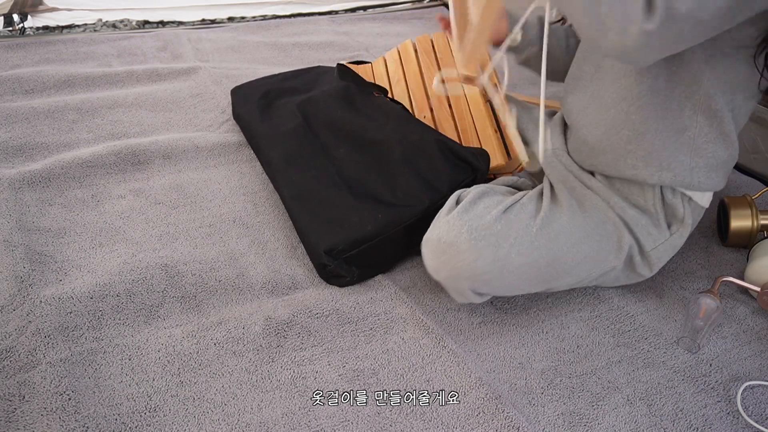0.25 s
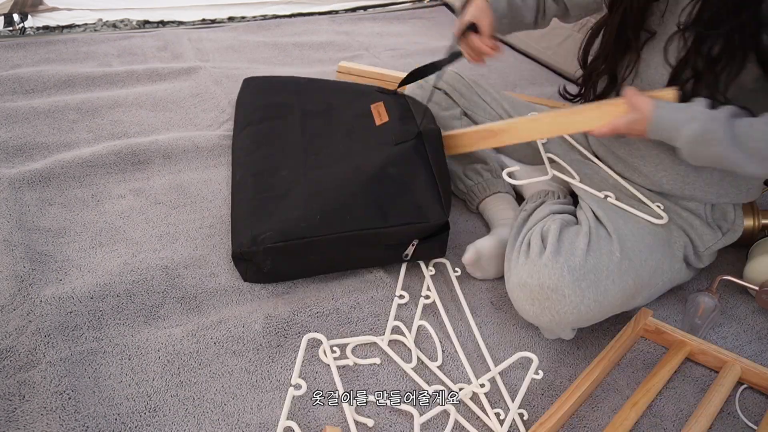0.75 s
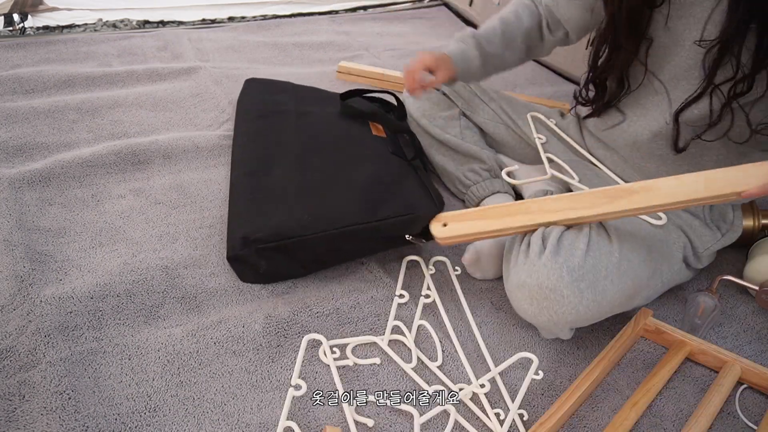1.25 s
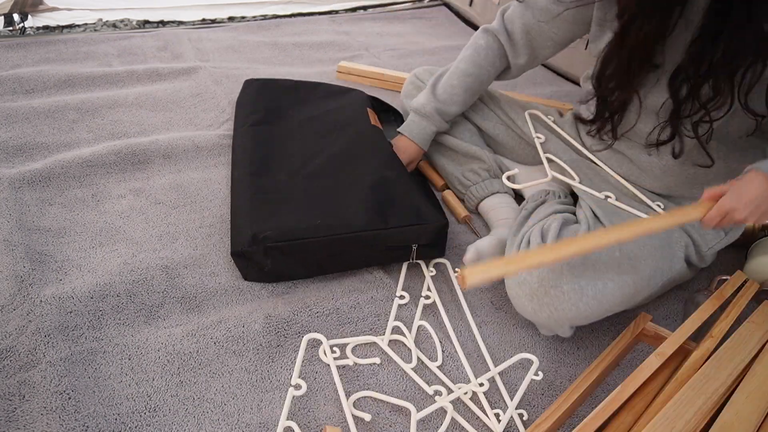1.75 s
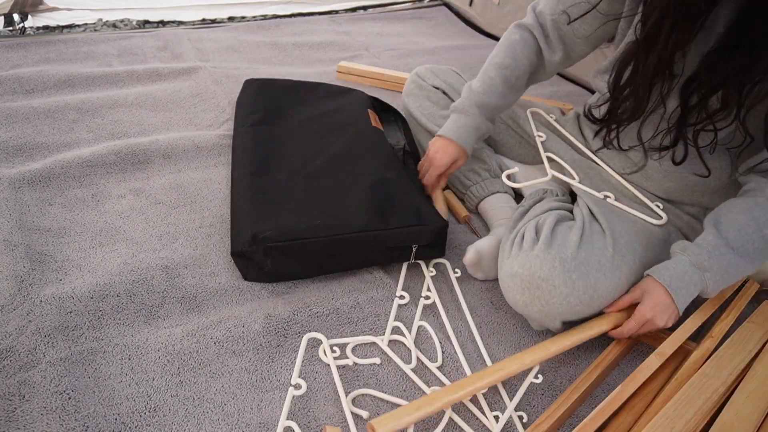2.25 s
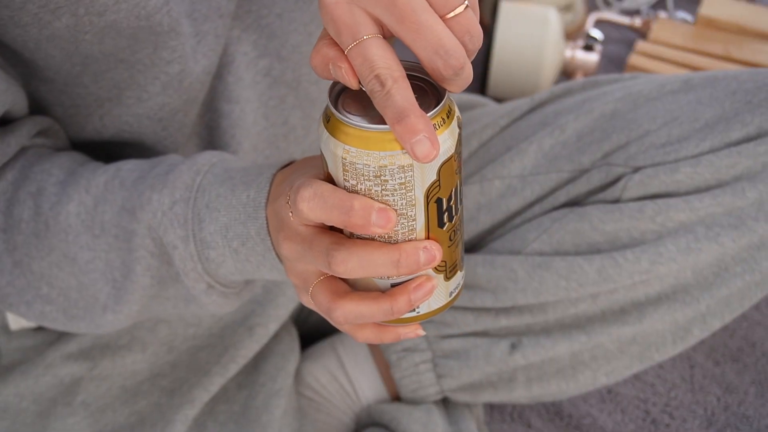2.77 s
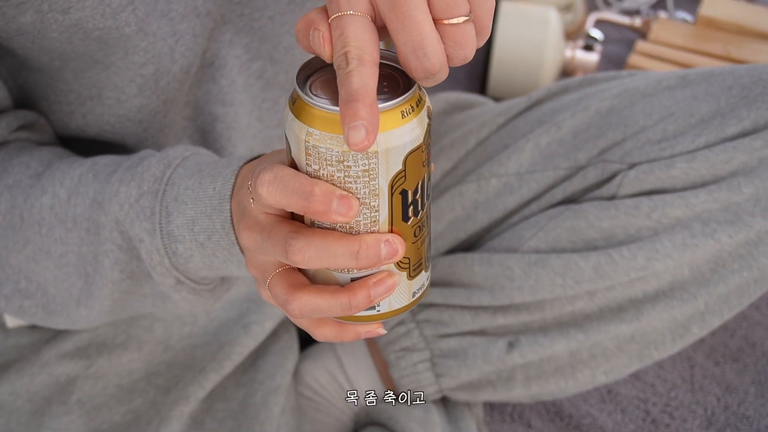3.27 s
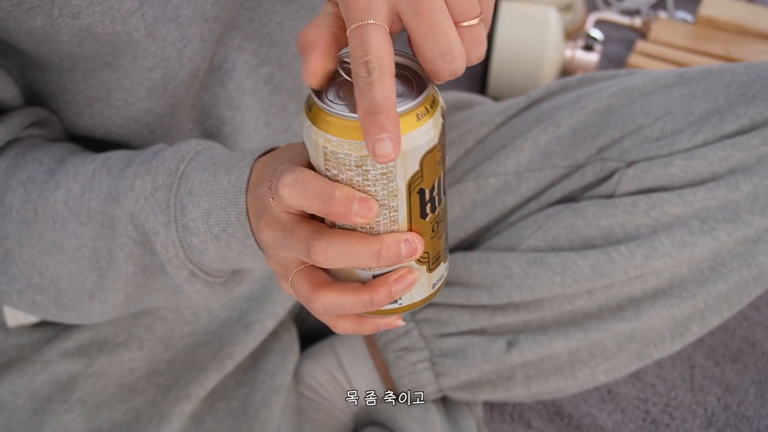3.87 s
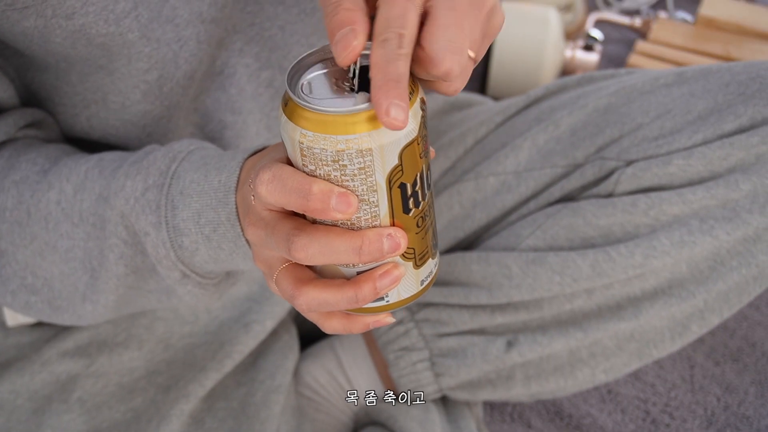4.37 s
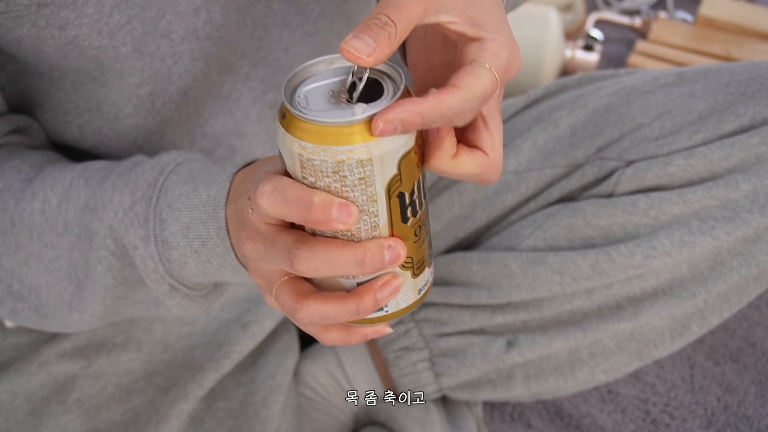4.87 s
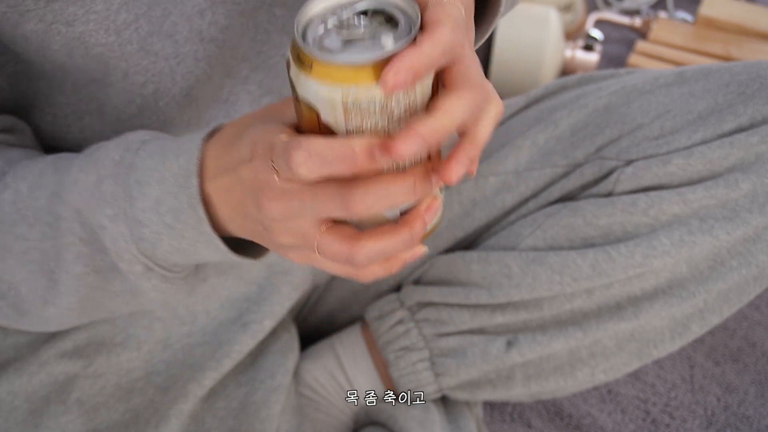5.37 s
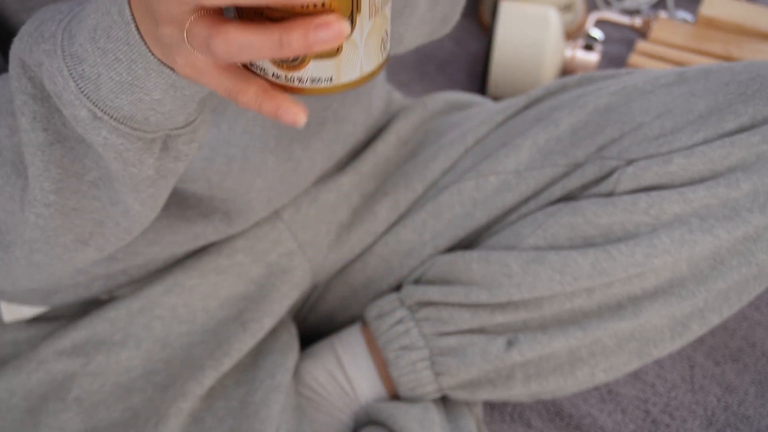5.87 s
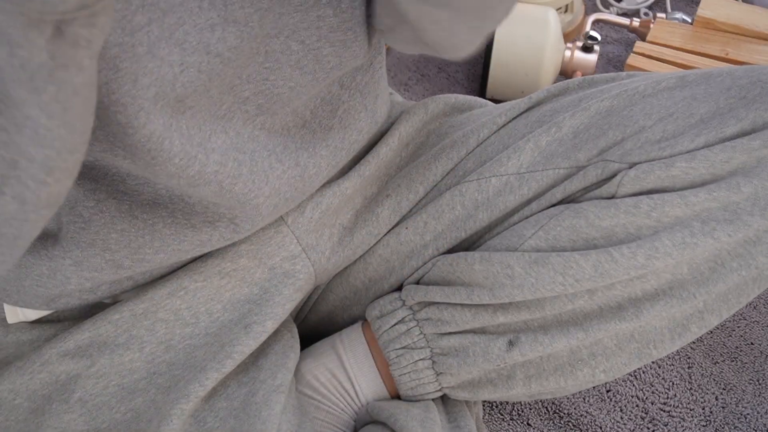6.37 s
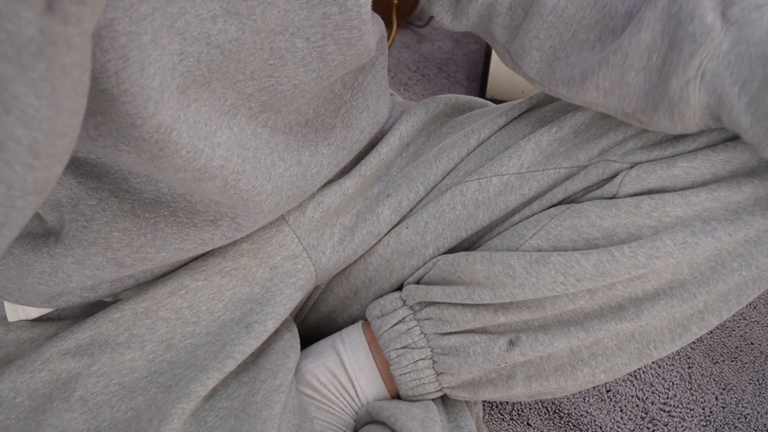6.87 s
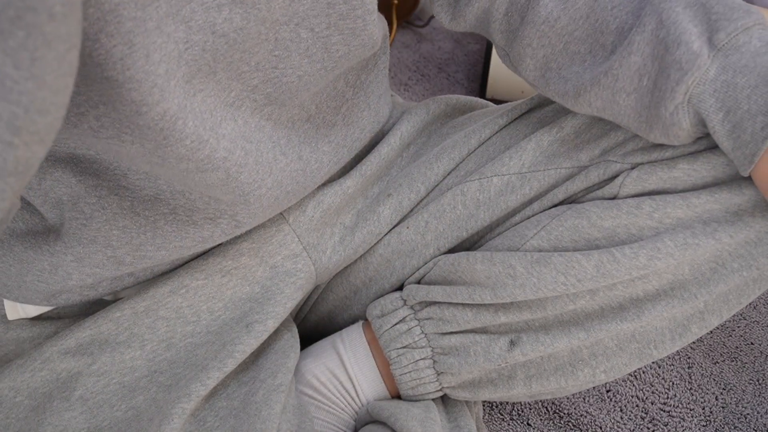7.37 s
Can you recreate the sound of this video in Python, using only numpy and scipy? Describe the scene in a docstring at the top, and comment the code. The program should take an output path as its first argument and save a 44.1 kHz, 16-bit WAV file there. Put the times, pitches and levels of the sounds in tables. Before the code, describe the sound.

Close, dry stereo microphone on a padded tent floor: fabric rustles while hard plastic hangers snap and wooden slats rattle together. After a pole slides, fingernails click on a thin metal can, with a short bright hiss. More ticks lead to a sharp crack and a second, lower fizz, then a scraping tab bend. Sleeves brush by, and quiet hanger clicks end the scene over barely audible outdoor air.

```python
"""In a tent, wooden poles and plastic hangers are pulled from a bag: they knock, clack, drag and slide.
Next a fingernail flicks the tab of a drink can and gas, a coloured noise, spurts out; more clicks and squeaks follow.
The lid cracks open with a second spurt, the tab scrapes as it is bent back, and a sleeve swishes past.
At the end a hand reaches among the poles and hangers. Sleeves and bag, made of noise, rustle throughout.
Each blow is a snap, a rattle and fading sine tones; echoes and faint air surround it all."""
import sys
import numpy as np
from scipy import signal
from scipy.fft import rfft, irfft, next_fast_len
from scipy.io import wavfile
from scipy.ndimage import uniform_filter1d, minimum_filter1d

SR = 44100
rng = np.random.default_rng(int(sys.argv[2]) if len(sys.argv) > 2 else 0)


def pcm_store(signal):
    """Save signal as 16-bit PCM."""
    levels = np.round(np.clip(np.atleast_2d(signal), -1, 1) * 32767)
    wavfile.write(sys.argv[1], SR, levels.astype(np.int16).T)


N = 336483


def gain_of(db):
    """Turns decibels into amplitude."""
    return 10 ** (np.asarray(db) / 20)


def evened(x):
    """Scales a sound to an rms of 1."""
    return x / np.sqrt(np.mean(x ** 2) + 1e-20)


def read(points, hz):
    """Reads a table between its points, on a logarithmic pitch axis."""
    f, value = np.transpose(points)
    return np.interp(np.log(hz + 1), np.log(f + 1), value)


def follow(rows):
    """Gives the start time, then each column of a table as a curve with a value per sample."""
    s, *columns = np.transpose(rows)
    t = np.arange(s[0], s[-1], 1 / SR)
    return [s[0]] + [np.interp(t, s, column) for column in columns]


def add(mix, s, sound):
    """Mixes a sound in, starting at time s."""
    part = mix[:, max(round(s * SR), 0):][:, :sound.shape[1]]
    part += sound[:, :part.shape[1]]


def shaped(x, spectrum):
    """Colours a steady sound with a table of pitch and level."""
    n = x.shape[-1]
    size = next_fast_len(n)
    gain = gain_of(read(spectrum, np.fft.rfftfreq(size, 1 / SR)))
    return irfft(rfft(x, size) * gain, size)[..., :n]


def low_cut(x, edge_hz):
    """Takes out the bass steeply, as small things radiate little of it."""
    sections = signal.butter(2, edge_hz, "high", fs=SR, output="sos").repeat(2, axis=0)
    return signal.sosfilt(sections, x)


# stereo width, the side part against the middle: f/Hz, level/dB
WIDTH = [(1000, -21), (2000, -15), (4000, -9), (8000, -7), (16000, -11)]


def spread(pair):
    """Makes two unrelated sounds into left and right: bass near mono, treble wider."""
    side = shaped(pair[1], WIDTH)
    return np.array([pair[0] + side, pair[0] - side])


def noise(count):
    """White noise, spread in stereo."""
    length = N if count > SR else SR // 2
    return spread(rng.standard_normal((2, length)))[:, :count]


def resonate(x, hz, width):
    """Lets a sound ring at one pitch with gain 1; the pitch may follow a curve."""
    turn = np.exp(2j * np.pi * np.cumsum(hz * np.ones(x.shape[-1])) / SR)
    r = np.exp(-np.pi * width / SR)
    # shift the pitch down to zero, smooth, and shift it back
    smooth = signal.lfilter([1 - r], [1, -r], x / turn + 1e-18)
    return 2 * (turn * smooth).real


def ring(x, modes):
    """Passes a sound through a set of steep resonances, each made of two wider ones in a row."""
    return sum(gain_of(db) * resonate(resonate(x, hz, 2 * width), hz, 2 * width)
               for hz, width, db in modes)


def flutter(depth_db=3.5, rate_hz=34):
    """A random unevenness of level: folds grip and let go, a jet sputters."""
    steps = rng.standard_normal(size=400)
    place = np.arange(N) / SR * rate_hz
    return gain_of(depth_db * np.interp(place, np.arange(len(steps)), steps))


def contact(x, hz, below, above, top_hz, floor_db=-46, size=8192):
    """Colours a blow: its hardness and place favour one region of pitch."""
    f = abs(np.fft.fftfreq(size, 1 / SR)) + 1
    octaves = np.log2(f / hz)
    db = np.maximum(np.minimum(below * octaves, -above * octaves), floor_db)
    db = db - 10 * np.log10(1 + (420 / (f + 40)) ** 4)  # small things radiate little bass
    db = db - 10 * np.log10(1 + (f / top_hz) ** 10)  # no contact is perfectly hard
    response = np.exp(np.conj(signal.hilbert(np.log(gain_of(db)))))  # nothing sounds before the blow
    return np.fft.ifft(np.fft.fft(x, size) * response).real[:, :x.shape[1]]


def blows(rows, ring_db, ring_t60, snap_db, rattle_t60, bass_fall_db, top_hz=14500,
          snap_t60=0.0047, smear=0.79, focus=0.15, count=6000):
    """Each blow is a sharp snap, a short dense rattle and the modes of the thing that is struck."""
    # ring_t60, snap_t60 in s; rattle_t60 in s for a blow of -20 dB; bass_fall_db per octave before focus
    out, t = np.zeros((2, N)), np.arange(count) / SR
    attack = round(.004 * SR)  # a blow's level is that of its first 4 ms
    for s, db, hz, treble_fall, modes in rows:
        t60 = rattle_t60 * (min(db, -10) / -20) ** smear  # soft touches drag, hard ones are crisp
        fade = gain_of(-60 * t / t60) + gain_of(snap_db - 60 * t / snap_t60)
        rattle = spread(rng.choice([-1., 1.], (2, count))) * fade
        chance = rng.standard_normal((len(modes), 3))
        tone = 0
        for (f, level), (detune, phase, lag) in zip(modes, chance):
            turns = f * (1 + 0.0015 * detune) * t + phase
            sides = np.array([[1], [-1]]) * lag * gain_of(read(WIDTH, f))  # left and right differ in phase
            fading = gain_of(ring_db + level - 60 * t / ring_t60)
            tone = tone + fading * np.sin(2 * np.pi * turns + sides)
        bass_fall = bass_fall_db + focus * treble_fall  # a narrow colour is narrow on both sides
        hit = contact(rattle + tone, hz, bass_fall, treble_fall, top_hz)
        add(out, s, gain_of(db) * hit / np.sqrt(np.mean(hit[:, :attack] ** 2)))
    return out


# colour of the outdoor air: f/Hz, relative level/dB
AIR = [(25, -39.5), (85, -9.5), (300, -5.5), (1000, 6.5), (2000, 1.5), (6000, -2.5), (16000, -9)]


def outdoor_air():
    """Faint air outside: steady coloured noise."""
    return gain_of(-66.0) * evened(shaped(noise(N), AIR))


# how long echoes take to fade by 60 dB: f/Hz, t/s
TENT = [(200, 0.058), (1500, 0.1), (5000, 0.13), (14000, 0.11)]


def tent(x, first_s=0.0054, count=9000):
    """Floor and fabric walls return a short, dense patter of echoes."""
    t = np.arange(count) / SR
    taps = rng.choice([-1., 1.], (2, count)) * (rng.random((2, count)) < 4000 / SR) * (t > first_s)
    hz, when, z = signal.stft(spread(taps), SR, nperseg=256)
    fade = gain_of(-60 * when / read(TENT, hz)[:, None])
    tail = signal.istft(z * fade, SR, nperseg=256)[1]
    return signal.oaconvolve(x, tail / np.linalg.norm(tail[0]), axes=1)[:, :N]


# a sleeve brushes past as the can is raised: t/s, level/dB before panning, f/Hz
SLEEVE_SWISH = [(5.9, -63, 2880), (6.12, -54.5, 2700), (6.33, -65, 2180)]


def swish(width_hz=520):
    """A sleeve brushes past: noise rings at a pitch that sinks."""
    s, db, hz = follow(SLEEVE_SWISH)
    return s, gain_of(db) * evened(ring(noise(len(hz)), [(hz, width_hz, 0)]))


def bumps(per_s, low_hz, high_hz, size=N, count=24):
    """Dull little contacts of wood, plastic and mat, each a few cycles at its own pitch."""
    out, t = np.zeros((1, size)), np.arange(SR // count) / SR
    for when, pitch, force in rng.random((int(per_s * size / SR), 3)):
        hz = low_hz * (high_hz / low_hz) ** pitch
        cycles = hz * t
        grain = np.sqrt(hz) * np.sin(2 * np.pi * cycles) * cycles ** 2 * np.exp(-cycles)
        add(out, when * size / SR, gain_of(10 * force ** 3) * grain[None])
    return evened(out[0])


def fibres(per_s, spread_db, grain_db):
    """Rubbing cloth: a smooth wash and many tiny catches of uneven size."""
    size = gain_of(spread_db * np.minimum(rng.exponential(1, (2, N)), 4))
    catches = rng.choice([-1., 1.], (2, N)) * size * (rng.random(N) < per_s / SR)
    return spread(rng.standard_normal((2, N)) + gain_of(grain_db) * evened(catches))


STROKE_RISE_S, STROKE_FALL_S, STROKE_SAG_DB_PER_S = 0.068, 0.021, 8  # a stroke gathers speed, slackens and stops
REST_BODY_DB, REST_HISS_DB = -63.5, -59.5  # cloth never lies quite still; before the trims in cloth()
# one row a movement of sleeve or bag: start t/s, length t/s, hiss level/dB (before the trims in cloth()),
# body against hiss level/dB (before the same trims)
CLOTH_STROKES = [(-0.05, 0.13, -33.5, -9.5), (0.06, 0.8, -42.5, -3), (0.517, 0.25, -35, -16),
                 (0.816, 0.35, -52.5, 2), (0.959, 0.34, -43.5, -5), (1.25, 0.33, -52.5, -1),
                 (1.565, 0.23, -47, -5.5), (1.753, 0.57, -61.5, 9), (2.119, 0.21, -46.5, -2.5),
                 (3.683, 0.47, -49, -7), (4.235, 0.39, -50.5, -3), (4.64, 0.53, -51, -7.5),
                 (5.329, 0.1, -44.5, -10), (5.444, 0.31, -49, -8), (5.817, 0.5, -48, -7.5),
                 (5.896, 0.086, -45.5, -26), (6.578, 0.34, -54.5, -28), (6.72, 0.11, -46.5, -31),
                 (6.934, 0.5, -50.5, -6.5), (6.985, 0.044, -41, -14), (7.38, 0.22, -49.5, -10),
                 (7.527, 0.2, -40.5, -19)]


def strokes():
    """Each movement makes body and hiss rise, sag and die away; overlapping ones add in power."""
    t = np.arange(N) / SR
    body, hiss = gain_of(REST_BODY_DB) ** 2, gain_of(REST_HISS_DB) ** 2
    for start, length, db, body_db in CLOTH_STROKES:
        age = np.maximum(t - start, 0)
        rise = np.minimum(age / STROKE_RISE_S, 1)
        speed = rise * np.exp(-np.maximum(age - length, 0) / STROKE_FALL_S)
        power = (speed * gain_of(db - STROKE_SAG_DB_PER_S * age)) ** 2
        body = body + power * gain_of(body_db) ** 2
        hiss = hiss + power
    return np.sqrt(body), np.sqrt(hiss)


# colours of the cloth's body, its hiss and the scuffed mat: f/Hz, relative level/dB
CLOTH_BODY = [(100, -64.5), (250, -33), (500, -24.5), (900, 6.5), (1300, 10), (1900, 12.5), (2600, 0.5),
              (4000, -38)]
CLOTH_HISS = [(1200, -34.5), (2400, -0.5), (3200, 2), (4600, 1), (6500, -4), (9000, -9.5), (12000, -14.5),
              (16000, -27.5)]
MAT_SCUFF = [(100, -38), (170, -9), (280, 4.5), (500, 13), (900, 5), (2000, -20.5)]
# where the arms are: t/s, left minus right level/dB
CLOTH_PAN = [(0.0, 1.0), (4.6, 0.0), (6.0, -2.0), (7.6, -0.8)]


def cloth(body_db=-4.0, hiss_db=-3.5, scuff_db=-61, bumps_db=-54, growth=2.7, ticks_db=-7, ticks_per_s=60):
    """Sleeves and bag rustle, fingers tick; strong movements also scuff the mat and jostle things on it."""
    body, hiss = strokes()
    rub = fibres(per_s=720, spread_db=3.0, grain_db=-10.5) * flutter()
    touches = noise(N) * (rng.random(N) < ticks_per_s / SR)
    tick_colour = shaped(touches, CLOTH_BODY) / gain_of(2.5) + shaped(touches, CLOTH_HISS)
    ticks = gain_of(ticks_db) * body * evened(tick_colour)
    out = body * gain_of(body_db) * evened(shaped(rub, CLOTH_BODY))
    out += ticks + .5 * tent(ticks)
    out += hiss * gain_of(hiss_db) * evened(shaped(rub, CLOTH_HISS))
    add(out, *swish())
    scuff = gain_of(scuff_db) * evened(shaped(rub, MAT_SCUFF))
    jostle = scuff + gain_of(bumps_db) * bumps(per_s=280, low_hz=580, high_hz=2600)
    vigour = body / gain_of(-48)  # 1 when the body stands at -48 dB
    pan_db = np.interp(np.arange(N) / SR, *np.transpose(CLOTH_PAN))
    return (out + vigour ** growth * jostle) * gain_of([pan_db / 2, -pan_db / 2])


# dull pushes carried through mat and hands by the heavier contacts: t/s, level/dB before the fade
THUDS = [(0.172, -43.5), (1.047, -37.5), (1.1541, -34), (4.17, -40)]
# colour of a push: f/Hz, relative level/dB
THUD = [(100, -32.5), (210, 3.5), (420, 7.5), (700, 10.5), (1500, -27.5), (4000, -47.5)]


def thuds(t60=0.069, attack_s=0.0047, count=6000):
    """A short, low puff that the soft mat damps at once."""
    out, t = np.zeros((2, N)), np.arange(count) / SR
    for s, db in THUDS:
        fade = np.minimum(t / attack_s, 1) * gain_of(db - 60 * t / t60)
        add(out, s, fade * evened(shaped(noise(count), THUD)))
    return out


# notes of a flat slat of wood, and of a hanger's hook and arm: f/Hz, relative level/dB
SLAT = [(1620, -1), (2610, 7), (5160, 5), (5281, 8.5), (6620, 4), (8020, 5.5)]
HANGER_HOOK = [(1490, 2.5), (3475, -3.5), (4290, 0), (4800, 5), (5006, -4.5), (6250, 1), (7910, -0.5)]
HANGER_ARM = [(3027, -4.5), (3171, 0.5), (4140, -20), (4330, -3.5), (5730, 7.5)]
# one row a clack: t/s, level/dB before panning, brightest f/Hz, fall above it (dB per octave), what rings
HANGER_CLACKS = [(0.3975, -15.5, 4850, 18, HANGER_HOOK), (0.4015, -5.5, 4800, 11, HANGER_HOOK),
                 (0.406, -14, 4970, 14, HANGER_HOOK), (0.5997, -7, 4290, 64, HANGER_ARM),
                 (0.6045, -22.5, 4000, 75, HANGER_ARM), (0.622, -23, 3900, 10, HANGER_ARM),
                 (1.1538, -29, 1530, 5.3, HANGER_HOOK), (6.965, -44.5, 2150, 5.1, HANGER_ARM),
                 (7.094, -34.5, 4570, 18, HANGER_HOOK), (7.2238, -37.5, 1460, 7.3, HANGER_ARM),
                 (7.257, -43, 1510, 8.2, HANGER_HOOK), (7.2975, -41.5, 2250, 13, HANGER_ARM),
                 (7.307, -36, 5750, 28, HANGER_HOOK), (7.322, -33, 2550, 5.4, HANGER_ARM),
                 (7.356, -47, 5600, 30, HANGER_ARM)]


def hanger_clacks():
    """Plastic hangers clack: a strong snap, a brief rattle and short-lived notes."""
    return blows(HANGER_CLACKS, ring_db=-16, ring_t60=0.034, snap_db=-4.5, rattle_t60=0.013, bass_fall_db=8)


# notes of the rack, a stacked pole and a hand-held pole: f/Hz, relative level/dB
RACK = [(450, 4.5), (820, 1.5), (1150, 0), (2050, -0.5), (2875, -3.5), (3260, -10), (3700, 1.5), (4550, 1),
        (4790, -1)]
STACKED_POLE = [(1595, 4.5), (1952, 2.5), (2440, 4.5), (2541, 2), (3410, 2.5)]
HELD_POLE = [(835, 6.5), (1618, 7.5), (2458, -0.5), (3432, 9.5)]
# one row a knock: t/s, level/dB, brightest f/Hz, fall above it (dB per octave), what rings
POLE_KNOCKS = [(0.047, -27.5, 2340, 24, RACK), (0.073, -42, 820, 9.5, RACK), (0.183, -26, 1450, 13, RACK),
               (0.704, -43, 820, 22, RACK), (0.7235, -9.5, 2600, 7.5, SLAT), (0.728, -24.5, 2760, 5, SLAT),
               (0.892, -35, 2150, 22, STACKED_POLE), (0.9675, -39.5, 2820, 8.5, RACK),
               (0.9815, -24.5, 3080, 18, RACK), (0.987, -26.5, 1430, 8, HANGER_HOOK),
               (1.006, -28.5, 1920, 9, RACK), (1.034, -29, 3700, 4, RACK), (1.046, -9.5, 3500, 13.5, RACK),
               (1.0615, -21, 3450, 10, RACK), (1.087, -27, 1170, 5.5, RACK), (1.160, -31, 2500, 9.5, SLAT),
               (1.173, -41.5, 1100, 5.5, RACK), (1.474, -42.5, 950, 4.5, RACK),
               (2.1113, -15, 1620, 3.5, STACKED_POLE), (2.118, -19.5, 2440, 7.5, STACKED_POLE),
               (2.127, -17.5, 1640, 3.5, RACK), (2.141, -25.5, 4360, 8, RACK),
               (2.185, -27.5, 1940, 14, STACKED_POLE), (2.216, -40, 1950, 12, STACKED_POLE),
               (2.2227, -14.5, 2000, 2.5, HELD_POLE), (2.266, -32, 1460, 1, HELD_POLE),
               (7.195, -44.5, 1940, 26.5, STACKED_POLE)]


def pole_knocks():
    """Wooden poles knock together: a longer rattle and wooden notes."""
    return blows(POLE_KNOCKS, ring_db=-10, ring_t60=0.045, snap_db=-8, rattle_t60=0.069,
                 bass_fall_db=14.0, top_hz=10500)


# a pole is dragged out over the others: t/s, level/dB
POLE_DRAG = [(0.965, -48), (0.985, -42), (1.07, -36.5), (1.15, -48.5)]


def drag(slips_per_s=520, width_hz=220):
    """A pole judders along its neighbours: each slip is a tiny knock that rings the rack."""
    s, db = follow(POLE_DRAG)
    slips = noise(len(db)) * (rng.random(len(db)) < slips_per_s / SR)
    ringing = ring(slips, [(hz, width_hz, level) for hz, level in RACK[1:]])
    return s, gain_of(db) * evened(low_cut(ringing, 250))


# a pole slides over the others: t/s, level/dB of the ringing
POLE_SLIDE = [(2.225, -50), (2.245, -31), (2.285, -51), (2.352, -45.5), (2.36, -86)]


def slide(width_hz=55, rasp_db=-11, grip_hz=2450, grip_width_hz=1100):
    """Wood grain catching on wood keeps the pole ringing, favouring notes near the pitch of the grip."""
    s, db = follow(POLE_SLIDE)
    rub = low_cut(resonate(noise(len(db)), grip_hz, grip_width_hz), 440)
    ringing = ring(rub, [(hz, width_hz, level) for hz, level in HELD_POLE])
    return s, gain_of(db) * (evened(ringing) + gain_of(rasp_db) * evened(rub))


# notes of the can's tab, rim and wall: f/Hz, relative level/dB
CAN_TAB = [(2450, -2.5), (4350, -8), (4640, 4), (6280, 1.5)]
CAN_RIM = [(3570, 7), (5270, -11), (6820, -16), (7780, 12)]
CAN_WALL = [(973, 0.5), (2060, -0.5), (2430, 3.5), (2700, 1), (5260, 6.7)]
# one row a click: t/s, level/dB before panning, brightest f/Hz, fall above it (dB per octave), what rings
CAN_CLICKS = [(2.636, -18, 4100, 16.3, CAN_TAB), (2.6893, -22.5, 2210, 34, CAN_WALL),
              (2.964, -44.5, 3180, 11, CAN_WALL), (3.199, -37, 3770, 14.4, CAN_TAB),
              (3.275, -16, 4370, 16.3, CAN_TAB), (3.2903, -18, 4400, 13, CAN_TAB),
              (3.319, -34, 2800, 6.2, CAN_TAB), (3.3272, -16, 3100, 9, CAN_WALL),
              (3.5255, -38.5, 2360, 10, CAN_WALL), (3.542, -36, 4400, 8.6, CAN_RIM),
              (3.5556, -12, 4500, 12.6, CAN_RIM), (3.615, -24.5, 3520, 15.4, CAN_RIM),
              (3.6187, -25, 4520, 15, CAN_RIM), (3.6855, -32, 1840, 6.8, CAN_WALL),
              (3.837, -44.5, 1250, 6, CAN_RIM), (3.847, -39.5, 1240, 4.5, CAN_WALL),
              (3.923, -41, 1630, 9.7, CAN_WALL), (4.162, -24.5, 2630, 9.9, CAN_WALL),
              (4.1683, -19, 2330, 3.6, CAN_WALL), (4.172, -12, 2250, 5.5, CAN_WALL),
              (4.4245, -38, 2370, 14.5, CAN_WALL), (4.499, -39, 1820, 8.4, CAN_WALL),
              (5.3015, -37.5, 1930, 13.6, CAN_WALL)]


def can_clicks():
    """The can clicks and cracks: the strongest snap of all, over quickly fading metal notes."""
    return blows(CAN_CLICKS, ring_db=-11.5, ring_t60=0.025, snap_db=1, rattle_t60=0.024, bass_fall_db=10.5)


# a fingertip squeaks on the lid, one table a squeak: t/s, level/dB before panning, f/Hz
SQUEAKS = [
    [(4.005, -51, 3560), (4.04, -48, 3770), (4.058, -39, 3900), (4.08, -42.5, 3600), (4.094, -56, 1960)],
    [(4.082, -64, 3420), (4.11, -57, 3920), (4.145, -62, 3720)],
]


def squeak(rows, jitter=0.021, partial_fall_db=-15):
    """Skin sticks and slips on the lid at an unsteady rate; each partial is weaker than the last."""
    s, db, hz = follow(rows)
    waver = evened(uniform_filter1d(noise(len(hz))[0], size=40))
    turns = np.cumsum(hz * (1 + jitter * waver)) / SR
    tone = sum(gain_of(partial_fall_db * k) * np.sin(2 * np.pi * (k + 1) * turns) for k in range(3))
    return s, np.array([[1], [1]]) * gain_of(db) * evened(tone)


# the tab scrapes as it is bent back: t/s, level/dB before panning, whistle f/Hz
TAB_BEND = [(4.71, -62, 7100), (4.76, -47, 7240), (4.81, -47.5, 6800), (4.88, -42.5, 6240),
            (4.97, -59.5, 5800)]
# the lid under the scraping tab: f/Hz (the first one moves), nominal width f/Hz, relative level/dB
LID = [(657, 132, 9.5), (1880, 49, 2.5), (3700, 170, 6), (7560, 280, 2.5), (8250, 1500, -2.5)]


def tab_bend(whistle_db=-7, whistle_width_hz=350, sag=1.35):
    """The tab's hinge scrapes: the lid resonates, and its lowest note sinks along with a thin whistle."""
    s, db, hz = follow(TAB_BEND)
    scrape = noise(len(hz)) * flutter()[:len(hz)] ** 2
    whistle = resonate(resonate(scrape, hz, whistle_width_hz), hz, whistle_width_hz)
    (low_hz, low_width, low_db), *upper = LID
    sinking_hz = low_hz * (hz / hz.mean()) ** sag
    lid = ring(scrape, [(sinking_hz, low_width, low_db)] + upper)
    both = evened(lid) + gain_of(whistle_db) * evened(whistle)
    return s, gain_of(db) * evened(low_cut(both, 330))


# resonances of the gas space under the lid: f/Hz, nominal width f/Hz, relative level/dB
HEADSPACE = [(2550, 290, 12.5), (5550, 800, 3), (8200, 300, 8.5)]


def spurt(rows, breadth_hz, cavity_db, low_edge_hz):
    """A turbulent jet through the slit, noise of moving pitch, sounds the space under the lid."""
    s, flow_db, hz = follow(rows)
    jet = noise(len(hz))
    jet = evened(resonate(resonate(jet, hz, breadth_hz), hz, breadth_hz))
    jet = jet + gain_of(cavity_db) * evened(ring(jet, HEADSPACE))
    jet = low_cut(jet, low_edge_hz)
    sputter = flutter(depth_db=1.0, rate_hz=357)[:len(hz)]
    return s, gain_of(flow_db) * evened(jet * sputter)


# gas leaving the can, one table a spurt: t/s, flow level/dB before panning, brightest f/Hz
FIRST_SPURT = [(2.640, -37.5, 4300), (2.657, -39, 5000), (2.672, -13.5, 10500), (2.683, -16.5, 9800),
               (2.694, -15.5, 7800), (2.703, -17, 7200), (2.728, -25.5, 4600), (2.758, -55.5, 3700)]
SECOND_SPURT = [(4.173, -16, 2890), (4.192, -22.5, 3480), (4.207, -20.5, 3520), (4.220, -27.5, 3440),
                (4.250, -46, 2980)]


def escaping_gas():
    """Gas spurts out twice: first bright, then duller with more of the space under the lid."""
    gas = np.zeros((2, N))
    add(gas, *spurt(FIRST_SPURT, breadth_hz=8380, cavity_db=-27.5, low_edge_hz=1780))
    add(gas, *spurt(SECOND_SPURT, breadth_hz=6500, cavity_db=-3, low_edge_hz=1600))
    return gas


def scene():
    """Poles, hangers, can and cloth in the tent, over faint outdoor air."""
    poles, hangers, can, gas = pole_knocks(), hanger_clacks(), can_clicks(), escaping_gas()
    add(poles, *drag())
    for rows in SQUEAKS:
        add(can, *squeak(rows))
    add(can, *tab_bend())
    sent = gain_of(-9.5) * poles + gain_of(-10.5) * hangers + gain_of(-9.5) * can + gain_of(-15.5) * gas
    echoes = tent(sent)
    add(poles, *slide())  # the slide sends no echoes
    a_little_left = gain_of([[.5], [-.5]])
    near = poles + (hangers + can + gas) * a_little_left
    return near + thuds() + echoes + cloth() + outdoor_air()


EDGE_HZ = 15900  # top of the band


def record(dry):
    """A fast limiter holds the sharpest peaks; then the highest treble is cut."""
    allowed = np.minimum(.85 / (abs(dry).max(0) + 1e-9), 1)
    limited = dry * uniform_filter1d(minimum_filter1d(allowed, size=81), size=81)
    band = signal.firwin(511, EDGE_HZ, window=("kaiser", 9), fs=SR)
    return signal.oaconvolve(limited, band[None], "same")


dry = scene()
out = record(dry)
pcm_store(out)
```